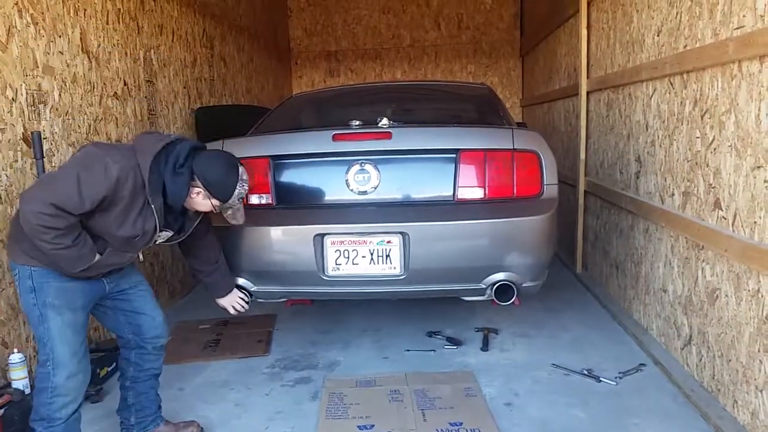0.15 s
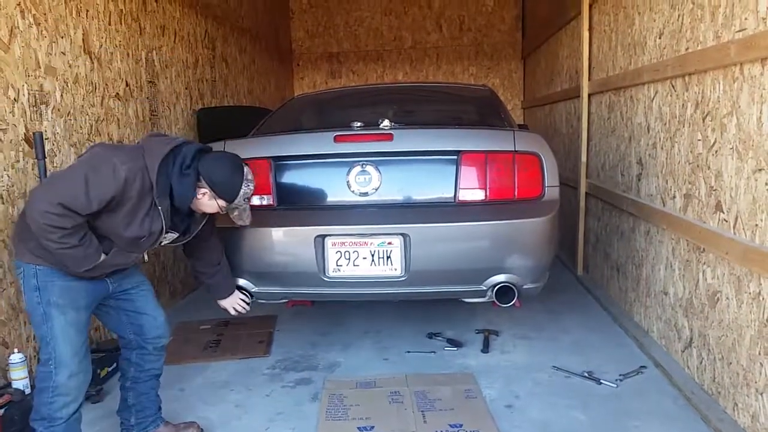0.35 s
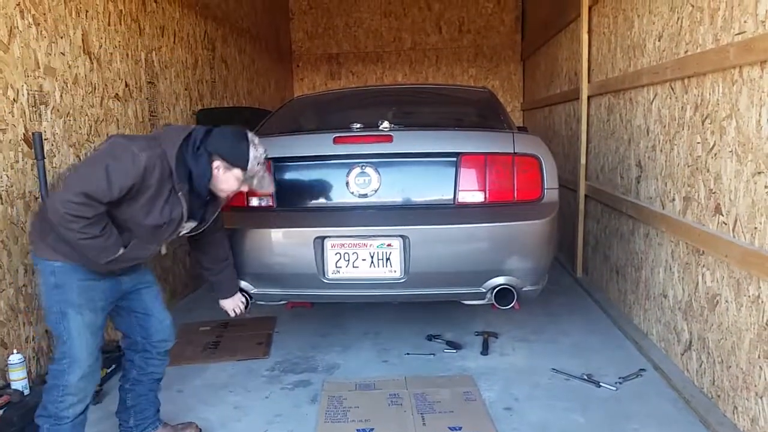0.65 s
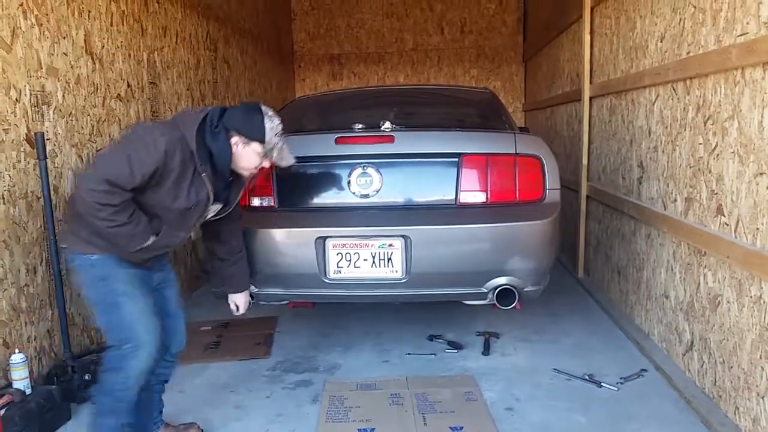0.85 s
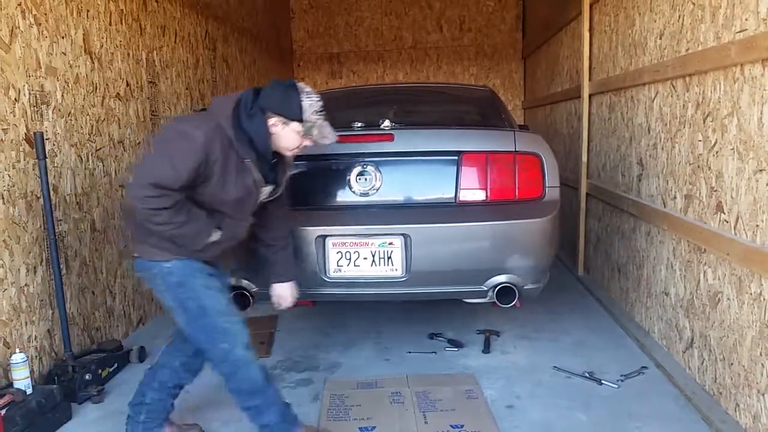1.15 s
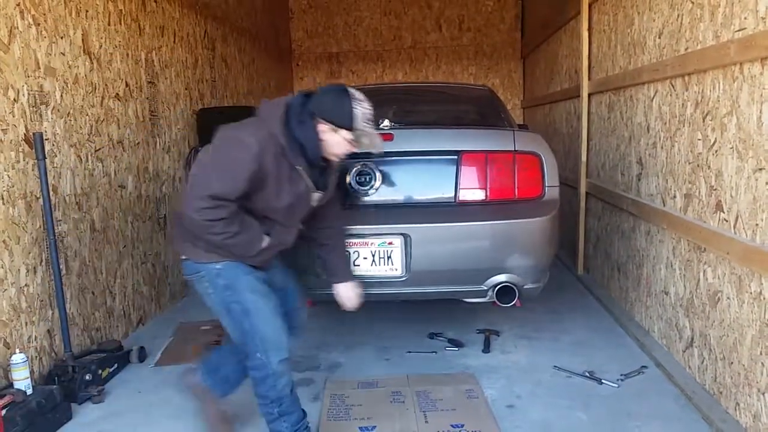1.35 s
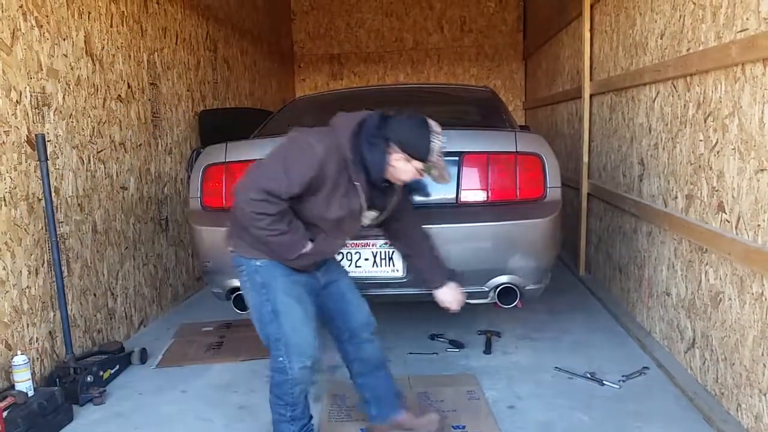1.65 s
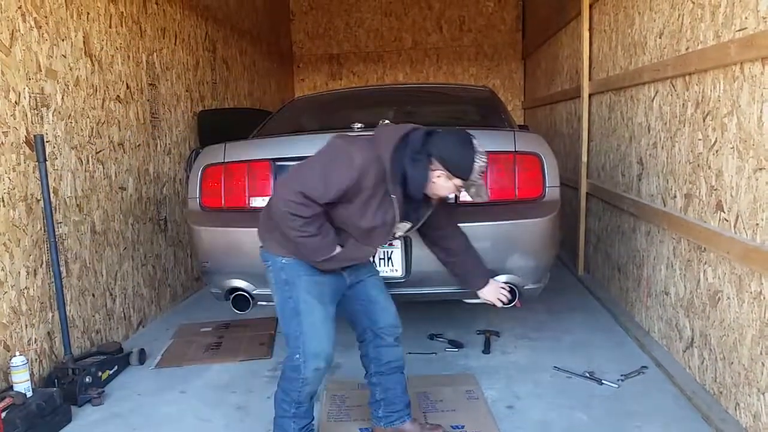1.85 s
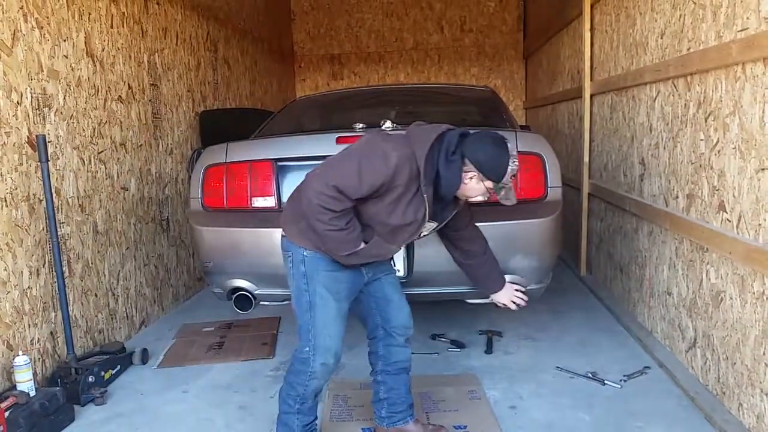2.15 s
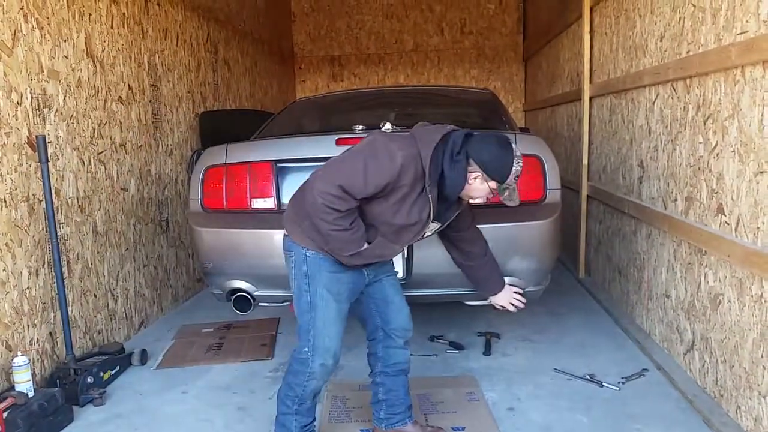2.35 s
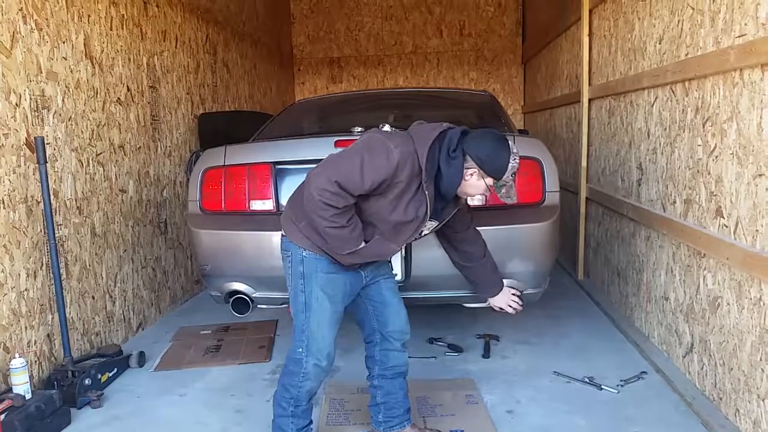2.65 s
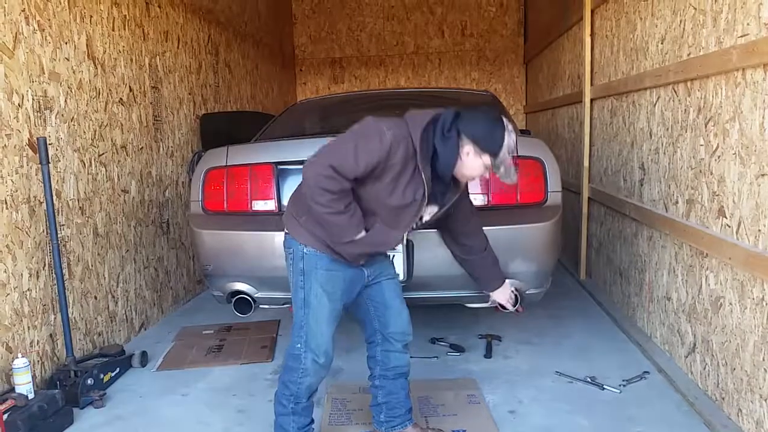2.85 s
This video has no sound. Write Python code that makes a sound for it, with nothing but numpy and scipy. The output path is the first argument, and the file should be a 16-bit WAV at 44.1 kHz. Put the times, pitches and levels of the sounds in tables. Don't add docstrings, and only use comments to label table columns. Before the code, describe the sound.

Continuous throaty V8 exhaust idle, heard close behind the tailpipes in a wood-walled garage; low booming pulses throb with buzzy metal rattle and airy hiss, the tone opening slightly as someone moves past the tips.

```python
import sys
import numpy as np
from scipy import signal
from scipy.fft import rfft, irfft
from scipy.io import wavfile
from scipy.ndimage import uniform_filter1d

SR = 44100
rng = np.random.default_rng(int(sys.argv[2]) if len(sys.argv) > 2 else 0)


def output_pcm(signal):
    pcm = np.clip(np.atleast_2d(signal).T, -1, 1) * 32767
    wavfile.write(sys.argv[1], SR, np.round(pcm).astype(np.int16))


def volts_from_db(level):
    exponent = np.asarray(level, float) / 20
    return 10 ** exponent


N = 132300

# (time [s], four-stroke cycles [1/s])
ENGINE_SPEED = [(0.0, 11.564), (0.2, 11.404), (0.4, 11.483), (0.6, 11.516), (0.8, 11.546), (1.0, 11.666),
                (1.2, 11.65), (1.4, 11.595), (1.6, 11.473), (1.8, 11.455), (2.0, 11.598), (2.2, 11.59),
                (2.4, 11.699), (2.6, 11.696), (2.8, 11.651), (3.0, 11.562)]
# (place in the cycle [0-1], strength [dB], bank [0 = A, 1 = B])
CYLINDERS = [
    (0.1211, 2.1, 0),
    (0.2642, 1.4, 1),
    (0.3718, 2.9, 1),
    (0.536, -1.1, 0),
    (0.631, -3.5, 1),
    (0.7568, -5.1, 0),
    (0.8756, 6.4, 0),
    (0.9956, 1.0, 1),
]
# (frequency [Hz], signed size [ratio], t60 [s])
PIPE_A = [(53.3, -0.0609, 0.136), (69.5, -0.0975, 0.318), (81.5, 0.3181, 0.105), (90.5, -0.081, 0.295),
          (127.8, -0.138, 0.253), (147.4, -0.1841, 0.241), (164.8, 0.1302, 0.252), (182.9, 0.038, 0.265),
          (221.1, -0.0722, 0.232), (229.1, 0.1655, 0.116), (296.3, 0.0185, 0.185), (313.6, 0.0223, 0.102),
          (362.4, 0.1593, 0.315), (370.4, -0.1203, 0.09)]
PIPE_B = [(57.5, 0.1141, 0.348), (64.0, -0.2382, 0.207), (86.5, 0.2253, 0.295), (96.5, 0.0537, 0.306),
          (121.5, -0.0772, 0.275), (144.3, -0.2474, 0.182), (169.6, 0.2583, 0.237), (177.9, -0.0908, 0.315),
          (213.5, -0.044, 0.339), (234.2, 0.0423, 0.205), (275.7, -0.0859, 0.299), (332.9, -0.039, 0.248),
          (358.6, -0.0731, 0.233), (380.0, 0.0822, 0.184)]
# (frequency [Hz], signed size [ratio], t60 [s])
SILENCER_A = [(438.9, -0.0358, 0.081), (451.7, 0.0235, 0.3), (507.7, 0.0328, 0.042),
              (511.9, -0.0233, 0.128), (596.6, -0.0447, 0.112), (598.6, 0.078, 0.046),
              (627.6, -0.0116, 0.131), (673.1, -0.0598, 0.041), (699.3, 0.0584, 0.046),
              (733.7, -0.0133, 0.3), (765.9, -0.0015, 0.3), (812.3, 0.0034, 0.3), (839.2, 0.0037, 0.3),
              (912.9, 0.0017, 0.3)]
SILENCER_B = [(404.5, -0.0063, 0.3), (442.8, -0.0174, 0.139), (501.5, -0.0086, 0.152),
              (527.5, 0.0214, 0.112), (572.3, -0.0118, 0.3), (607.5, 0.0194, 0.3), (626.5, 0.0044, 0.3),
              (672.9, -0.005, 0.3), (710.7, -0.0132, 0.3), (733.8, 0.0559, 0.047), (738.7, -0.0219, 0.167),
              (823.6, 0.0038, 0.3), (845.6, -0.0082, 0.3), (912.7, -0.0055, 0.246)]
# (time [s], bank A [dB], bank B [dB])
SHADE = [
    (0, -1, -13),
    (.85, 0.5, -6.5),
    (1.1, 2.5, -1.5),
    (1.8, -2, -5),
    (2.0, 2.4, 1.2),
    (3, 2.9, 1),
]
TICK_STRENGTHS = [0.93, 0.55, 0.22, 0.89, 0.57, 0.61, 0.77, 0.58]
# (frequency [Hz], width [Hz], level [dB])
RATTLE_MODES = [(1580, 70, -11), (1850, 300, -13), (2300, 170, -1), (2560, 110, -4), (2800, 120, -6),
                (3670, 170, -2), (3950, 150, -6), (4510, 240, 2), (5200, 800, -1)]
# (time [s], level [dB])
SHAKE = [
    (0, 0.2),
    (.4, 1.5),
    (.9, 1.5),
    (1.2, 3),
    (1.5, 1.3),
    (1.9, 1),
    (2.2, 1),
    (3, 1.5),
]
# (frequency [Hz], level [dB per Hz])
RUSH_SPECTRUM = [(40, -25), (110, 4.5), (250, -15), (450, -4.5), (800, -4), (1050, -13), (1250, -27),
                 (2000, -57)]
# (frequency [Hz], level [dB per Hz])
HISS_SPECTRUM = [(1000, 3), (3000, 6.5), (6000, -3.5), (8500, -25.5), (10500, 1), (12300, 11.5), (14000, 0),
                 (16000, -35)]
# (time [s], level [dB])
JET = [
    (0, 1.5),
    (1.0, 1),
    (1.7, 0),
    (2.0, 2.5),
    (3, 4.5),
]
# (frequency [Hz], level [dB per Hz])
SHED_SPECTRUM = [(350, -21), (430, -3), (500, -27), (700, -4.5), (830, 7.5), (900, -10), (1080, -8),
                 (1250, -33.5)]
# (frequency [Hz], level [dB])
PORT_DIFFERENCE = [(60, .6), (400, 1.6), (1300, 5), (2400, 8), (3200, 14), (4600, 29), (8000, 10),
                   (12500, 11), (15500, 0)]

RUSH_LIKENESS, TREBLE_LIKENESS = 0.8, 0.6


def curve(table, at, log=False):
    a, b = np.array(table, float).T[:2]
    if log:
        return np.interp(np.log(at + 1), np.log(a), b)
    return np.interp(at, a, b)


def colour(x, table, scale=0.9, lag_s=0.0):
    hz = np.arange(N // 2 + 1) * SR / N
    gain = volts_from_db(scale * curve(table, hz, True))
    return irfft(rfft(x) * gain * np.exp(-2j * np.pi * hz * lag_s), N)


def level(x, db):
    return x * volts_from_db(db) / np.sqrt(np.mean(x ** 2))


def ring(x, hz, t60):
    pole = np.exp((2j * np.pi * hz - np.log(1000) / t60) / SR)
    return signal.lfilter([1], [1, -pole], x).imag


def walk(rate):
    k = int(SR / rate)
    steps = np.repeat(rng.standard_normal(N // k + 1), k)
    wander = uniform_filter1d(uniform_filter1d(steps, k), k)[:N]
    return wander / wander.std()


def pair(likeness):
    a, b = rng.standard_normal((2, N))
    c = np.clip(likeness, 0, 1)
    return np.array([a, c * a + np.sqrt(1 - c * c) * b])


def firings(turns, lead):
    scatter_db, jitter_s = 0.3, 0.00003
    banks, index = np.zeros((2, len(turns) + 1)), np.arange(len(turns))
    cycles = np.arange(np.ceil(turns[0]), np.floor(turns[-1]) - 1)
    cycles = np.append(cycles, cycles[-1] + np.arange(1, 3))
    for place, db, bank in CYLINDERS:
        uneven = rng.standard_normal((len(cycles), 2))
        at = np.interp(cycles + place, turns, index, right=-9e3) + jitter_s * SR * uneven[:, 0]
        ok = at > 0
        at, size = at[ok], volts_from_db(db + scatter_db * uneven[ok, 1])
        i = np.minimum(at.astype(int), len(turns) - 1)
        np.add.at(banks[int(bank)], i, size * (1 - at + i))
        np.add.at(banks[int(bank)], i + 1, size * (at - i))
    return banks[:, :-1]


def resonate(banks, mode_tables):
    return np.array([sum(size * ring(pulses, hz, t60) for hz, size, t60 in modes)
                     for pulses, modes in zip(banks, mode_tables)])


def exhaust(banks, lead, t):
    shade_a = curve(SHADE, t)
    shade_b = curve(np.array(SHADE)[:, ::2], t)
    pipes = resonate(banks, (PIPE_A, PIPE_B))[:, lead:]
    silencers = resonate(banks, (SILENCER_A, SILENCER_B))[:, lead:]
    tone = pipes + volts_from_db(np.array([shade_a, shade_b])) * silencers
    pan_db = 0.8 * np.array([[0.35, -0.83], [-0.85, 0.73]])
    return volts_from_db(0.42 + pan_db) @ tone


def ticks(turns):
    first_at, width = 0.08, 0.03
    count = len(TICK_STRENGTHS)
    u = (turns - first_at) * count + 0.5
    strength = np.array(TICK_STRENGTHS)[u.astype(int) % count]
    return strength * np.exp(-((u % 1 - 0.5) / count / width) ** 2)


def throb(turns, swell_db, at, twice_db=0.0):
    phase = 2 * np.pi * (turns - at)
    return volts_from_db(swell_db * np.cos(phase) + twice_db * np.cos(2 * phase))


def rattle(tick, t):
    gain = volts_from_db(6 * tick + curve(SHAKE, t) + 1.5 * walk(30))
    clatter = 0
    for hz, width_hz, db in RATTLE_MODES:
        grains = pair(TREBLE_LIKENESS) * volts_from_db(2.2 * walk(250)) * gain
        clatter = clatter + level(ring(grains, hz, np.log(1000) / (np.pi * width_hz)), db)
    clatter = colour(clatter, [(6300, -9.5), (8500, -11.5)])
    high_pass = signal.butter(4, 1400, "high", fs=SR, output="sos")
    return level(signal.sosfilt(high_pass, clatter), -32)


def rush(tick):
    gas = pair(RUSH_LIKENESS) * volts_from_db(1.5 * tick + 2.2 * walk(20))
    return level(colour(gas, RUSH_SPECTRUM), -33)


def hiss(turns, tick, t):
    flutter_db = 0.43 * walk(25.1) + 1.3 * walk(120)
    jet = volts_from_db(curve(JET, t) + flutter_db + 1.0 * tick)
    jet = jet * throb(turns, swell_db=1.5, at=0.62, twice_db=1.2)
    return level(colour(pair(TREBLE_LIKENESS / 3) * jet, HISS_SPECTRUM), -38.5)


def whistle(turns):
    hz, width_hz = 1370, 34
    t60 = np.log(1000) / (np.pi * width_hz)
    sung = ring(ring(pair(RUSH_LIKENESS), hz, t60), hz, t60 / 3)
    return level(sung * throb(turns, swell_db=5, at=0.67), -46)


def shed(banks, t):
    t60_s = 0.15
    tail = np.arange(SR // 4) / SR
    echo = rng.standard_normal((3, 2, 2, len(tail))) * np.exp(-np.log(1000) * tail / t60_s)
    own = np.sqrt(1 - RUSH_LIKENESS ** 2)
    echo[:, 1] = RUSH_LIKENESS * echo[:, 0] + own * echo[:, 1]
    length = len(banks[0])
    out = 0
    for k, mid_s in enumerate((0.4, 1.4, 2.4)):
        heard = signal.fftconvolve(banks[None], echo[k], axes=-1).sum(1)[:, length - N:length]
        fade = np.clip(1.4 - abs(t - mid_s) * 1.67, 0, 1)
        opening = (k == 0) * (t < 0.2) * 0.3
        out = out + heard * np.sqrt(fade + opening)
    return level(colour(out, SHED_SPECTRUM), -34.5) * volts_from_db(curve(SHADE, t))


def scene():
    lead, t = SR // 2, np.arange(N) / SR
    speed = curve(ENGINE_SPEED, np.arange(-lead, N) / SR)
    turns = np.cumsum(speed) / SR - lead * speed[0] / SR
    banks = firings(turns, lead)
    turns = turns[lead:]
    tick = ticks(turns)
    engine = exhaust(banks, lead, t) + rattle(tick, t)
    gas = rush(tick) + hiss(turns, tick, t) + whistle(turns)
    return engine + gas + shed(banks, t)


def roll_off(x):
    return signal.sosfilt(signal.butter(12, 15610, fs=SR, output="sos"), x)


def record(dry):
    lift = [(60, 0.42), (400, 1.64), (1000, 1.3)]  # (frequency [Hz], level [dB])
    port_lag_s, ceiling = 0.0002, 0.98
    left = colour(dry[0], lift, lag_s=-port_lag_s / 2)
    right = colour(dry[1], lift, lag_s=port_lag_s / 2)
    right = colour(right, PORT_DIFFERENCE, -1.0)
    left = signal.lfilter(*signal.butter(1, 6, "high", fs=SR), left)
    both = np.array([left, right])
    mix = both / (1 + (abs(both) / ceiling) ** 6) ** (1 / 6)
    return roll_off(mix)


dry = scene()
out = record(dry)
output_pcm(out)
```